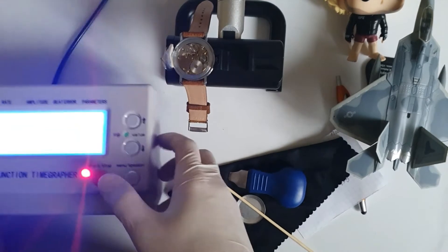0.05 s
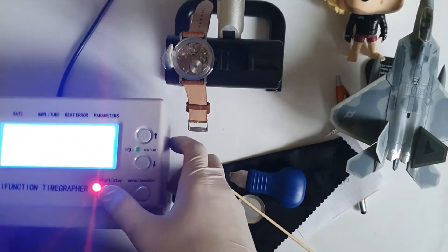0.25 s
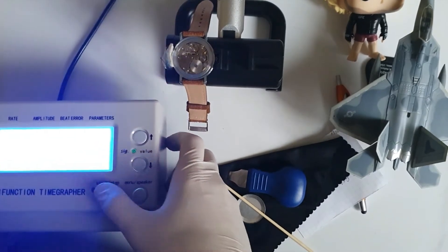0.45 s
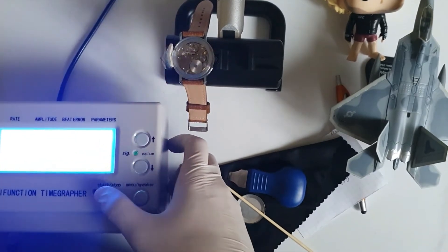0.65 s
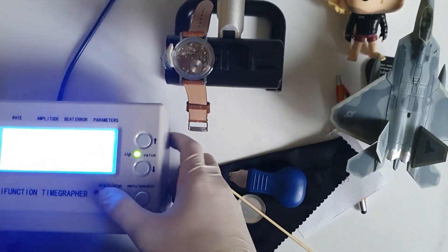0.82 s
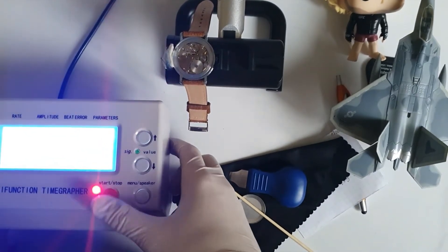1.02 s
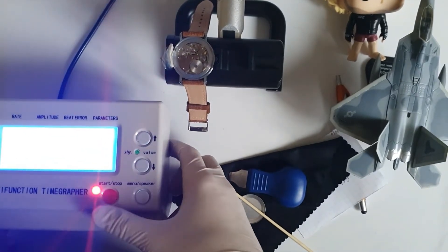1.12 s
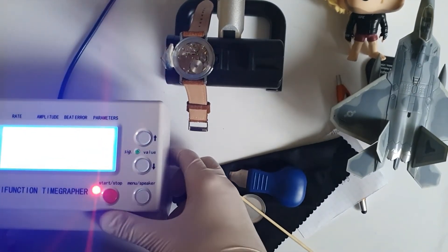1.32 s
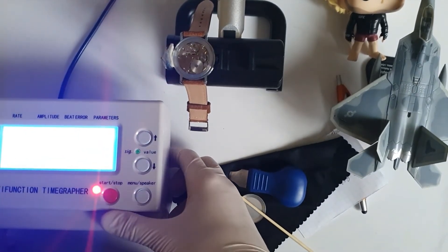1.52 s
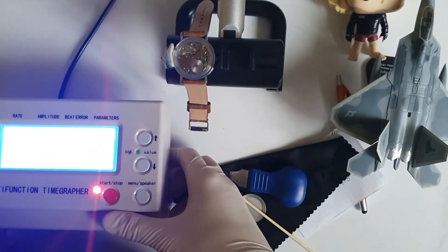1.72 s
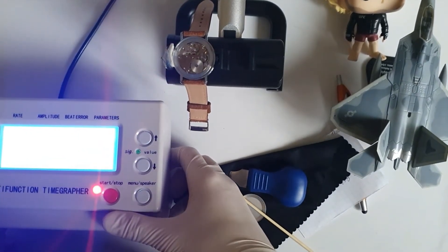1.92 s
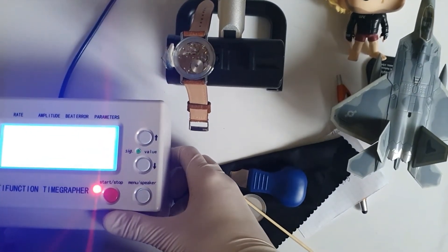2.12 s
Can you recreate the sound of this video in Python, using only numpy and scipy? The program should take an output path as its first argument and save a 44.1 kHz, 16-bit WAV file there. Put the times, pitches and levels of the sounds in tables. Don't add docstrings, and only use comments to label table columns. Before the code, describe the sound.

Plastic device case shoved and set down on a desk, followed by sharp push-button clicks, quiet room

```python
import sys
import numpy as np
from scipy import signal
from scipy.fft import rfft, irfft, next_fast_len
from scipy.io import wavfile
from scipy.ndimage import uniform_filter1d

SR = 44100
rng = np.random.default_rng(int(sys.argv[2]) if len(sys.argv) > 2 else 0)


def unload_wav(signal):
    wavfile.write(
        sys.argv[1],
        SR,
        np.round(np.clip(np.atleast_2d(signal).T, -1, 1) * 32767).astype(np.int16),
    )


def volts_from_decibels(level):
    exponent = np.asarray(level, float) / 20
    return 10 ** exponent


N = 94815

# pitch_hz, level_db (per hertz)
AIR_COLOUR = [(90, -2.5), (200, -13), (400, -28.5), (1000, -23), (3000, -30), (7000, -38), (14500, -36)]
# time_s, hum_db, rumble_db
HUM_LEVELS = [(0.0, -55.5, -41), (0.17, -68.5, -57.5), (0.23, -66, -47), (0.35, -58, -53), (0.58, -71, -58),
              (0.71, -62, -52.5), (0.79, -79, -70.5), (0.83, -64, -65), (1.08, -72.5, -63.5),
              (1.33, -71.5, -76.5), (1.41, -64, -72), (1.83, -69, -78), (1.93, -76, -69),
              (1.98, -61, -81.5), (2.07, -91.5, -84.5), (2.15, -76, -82.5)]
# time_s, scrape_db
DRAG_LEVELS = [(0, -55), (.05, -61), (.1, -60.5), (.18, -66.5), (.23, -63), (.27, -66), (.32, -91.5)]
# pitch_hz, level_db
SCRAPE_COLOUR = [(500, 2.5), (1200, -1.5), (2400, -6), (5000, -6), (9000, -6), (12000, -6), (14500, -18)]
# time_s, rumble_db, pitch_shift_share (0 low, 1 high)
SHOVE_LEVELS = [(0, -40, 0.81), (.05, -41, 0.5), (.1, -46.5, 0.77), (.18, -52.5, 0), (.38, -50.5, 0.77),
                (.44, -42, 0), (.5, -41.5, 0.08), (.57, -54, 0.1), (.66, -54, 0.02), (.79, -68.5, 0.1),
                (.88, -68.5, 0.97), (1.2, -84.5, 0.63)]
# time_s, level_db
RUB_LEVELS = [(.2, -100), (.25, -69.5), (.34, -71), (.43, -80), (.47, -100)]
# pitch_hz, level_db, t60_s (time to fade by 60 dB)
DESK_MODES = [(135, -9.5, 0.3), (236, -1, 0.098), (272.8, 3.5, .12), (301, -4, .1), (339.2, 0.5, .14),
              (392.6, -1, 0.045), (431, 1, .18), (470.3, -9.5, 0.19), (523.4, -9.5, .14), (566, -10, 0.45),
              (770, -10.5, 0.1039), (867, -14, .1), (1077, -14.5, 0.3), (1258, -13.5, .08)]
# start_s, level_db, pitch_hz,
# rise_cycles, extra_pitch_share (at the start)
CASE_THUMPS = [
    (.2161, -14.5, 295, .8, .7),
    (.9098, -34, 480, .8, .02),
    (.9072, -38, 230, .65, .02),
    (1.0140, -24, 500, .9, .05),
               (0.058, -39, 456, 0.98, 0.16), (0.2015, -35, 495, 0.47, 0.16),
                (0.216, -33.5, 135, 0.29, 0.38), (0.238, -29, 415, 0.34, 0.34),
                (.363, -42, 557, 0.75, 0.18), (0.4499, -31.5, 441, 0.43, 0.48),
                (.542, -39, 380, 0.39, 0.24), (0.5819, -31.5, 500, 0.51, 0.23),
                (.655, -49, 370, 0.82, 0.086), (.816, -51.5, 245, 0.46, 0.12),
                (0.892, -49.5, 233, 0.51, 0.36), (1.0154, -40.5, 232.4, 0.606, 0.29),
                (1.608, -63.5, 418, 0.56, 0.083)]
# start_s, level_db, centre_hz, width_hz, room_db
CONTACT_SNAPS = [(0.0604, -29, 2240, 1480, -12), (0.2186, -34, 1440, 900, -2.5), (.222, -40, 850, 900, -2),
                 (0.363, -37.5, 840, 600, -28), (0.4482, -39.5, 3800, 8450, 6),
                 (0.5795, -36.5, 1200, 1270, -4.5), (0.584, -48.5, 3830, 900, -23),
                 (0.9105, -25, 3890, 5126, -4.5), (0.9105, -36, 9700, 5000, -1.5),
                 (1.0127, -29, 3660, 2600, -18), (1.0150, -22, 1318, 1400, -13.5),
                 (1.137, -59, 2148, 1550, -22.5), (1.6107, -50, 2650, 1400, -18)]
# pitch_hz, level_db, t60_s
ROOM_BANDS = [(173.7, -1, .45), (337, -16, .4), (700, -6, 0.19), (1400, -4, 0.3), (2810, -10, 0.44),
              (5600, -10.5, 0.46), (11800, -9, .48)]
# pitch_hz, left_over_right_db
LEFT_LEAN = [(60, 3), (110, 8.5), (200, 6.5), (370, 2.5), (680, 3.5), (1240, 7), (2270, 2.5), (4160, 8),
             (7620, 5.5), (14000, 0.5)]


def level(x, db):
    return x * volts_from_decibels(db) / np.sqrt(np.mean(x ** 2))


def colour(x, points):
    n = next_fast_len(x.shape[-1] + 2048)
    p = np.array(points, float)
    hz = np.maximum(np.arange(n // 2 + 1) * SR / n, 1)
    gain = volts_from_decibels(np.interp(np.log(hz), np.log(p[:, 0]), p[:, 1], left=-60))
    return irfft(rfft(x, n) * gain, n)[..., :x.shape[-1]]


def band(x, hz, width_hz):
    return signal.lfilter(*signal.iirpeak(hz, hz / width_hz, SR), x)


def curve(table, column):
    p = np.array(table, float)
    return volts_from_decibels(np.interp(np.arange(N) / SR, p[:, 0], p[:, column]))


def walk(rate_hz):
    hold = int(SR / rate_hz)
    steps = np.repeat(rng.standard_normal(N // hold + 1), hold)
    return uniform_filter1d(steps, hold)[:N]


def stereo_noise(size):
    split_hz = 500
    noise = rng.standard_normal((3, size))
    shared_bass = signal.lfilter(*signal.butter(2, split_hz, fs=SR), noise[0])
    return shared_bass + signal.lfilter(*signal.butter(2, split_hz, "high", fs=SR), noise[1:])


def pan(db):
    return volts_from_decibels(np.array([[db], [-db]]) / 2)


def background():
    air = level(colour(stereo_noise(size=N), AIR_COLOUR), -78) * volts_from_decibels(0.573 * walk(12))
    hum_hz, waver_hz, flutter_db = 62, 3.2, 6
    turns = np.cumsum(hum_hz + waver_hz * walk(12)) / SR
    port_drift = 0.4 * np.array([walk(8.2), walk(18)])
    hum = np.sin(2 * np.pi * turns + port_drift) * volts_from_decibels(4 + flutter_db * walk(29))
    low = rng.standard_normal((3, N))
    rumble = level(band(band(low[0] + 1.35 * low[1:], 100, 57.8), 120, 90), 0)
    machine = hum * curve(HUM_LEVELS, 1) + rumble * curve(HUM_LEVELS, 2)
    return air + machine * pan(5.5)


def desk(force):
    ln_60_db = np.log(1000)
    return sum(volts_from_decibels(db) * band(force, hz, ln_60_db / np.pi / t60) for hz, db, t60 in DESK_MODES)


def drag():
    grains = rng.standard_normal((2, N)) * volts_from_decibels(1.8 * rng.exponential(size=N) + 1.5 * walk(60))
    scrape = level(colour(grains, SCRAPE_COLOUR), 0) * curve(DRAG_LEVELS, 1)
    rub_hz = 3800
    rub = level(band(band(grains[::-1], rub_hz, 4900), rub_hz, 6500), 0) * curve(RUB_LEVELS, 1)

    shoves = rng.standard_normal(N) * volts_from_decibels(1.65 * walk(45.79))
    time_s, shift = np.array(SHOVE_LEVELS)[:, ::2].T
    high = np.clip(np.interp(np.arange(N) / SR, time_s, shift), 0, 1)
    low_ring = level(desk(band(shoves, 310, 150)), 0)
    high_ring = level(desk(band(shoves, 570, 250)), 0)
    ring = (1 - high) * low_ring + high * high_ring
    return scrape + rub, ring * curve(SHOVE_LEVELS, 1)


def thumps():
    size = 2048
    out, t = np.zeros(N + size), np.arange(size) / SR
    for start_s, db, hz, rise, sag in CASE_THUMPS:
        u = t * hz / rise
        turns = rise * (u + sag * 2 * (1 - np.exp(-u / 2)))
        swell = (u / 3 * np.exp(1 - u / 3)) ** 3
        start = int(start_s * SR)
        out[start:start + size] += volts_from_decibels(db) * swell * np.sin(2 * np.pi * turns)
    return out[:N]


def snaps():
    size, fade_s = 2048, 0.004
    near, far, t = np.zeros((2, N + size)), np.zeros(N + size), np.arange(size) / SR
    noises = rng.standard_normal((len(CONTACT_SNAPS), 2, size))
    for (start_s, db, hz, width_hz, room_db), noise in zip(CONTACT_SNAPS, noises):
        gain = volts_from_decibels(db) * np.sqrt(SR / 2 / width_hz)
        wide_hz = min(2 * width_hz, SR / 3)

        def shell(x):
            return gain * band(band(band(x, hz, width_hz), hz, wide_hz), hz, wide_hz)

        tick = shell(2. * (t == 0))
        spit = shell(noise * np.exp(-t / fade_s))
        here = slice(int(start_s * SR), int(start_s * SR) + size)
        near[:, here] += 0.25 * tick + 0.11 * spit
        far[here] += volts_from_decibels(room_db) * tick
    return near[:, :N], far[:N]


def rattle(blows):
    fade_s, hz = 0.049, 420
    fade = np.exp(-1 / (fade_s * SR))
    shake = signal.lfilter([1 - fade], [1, -fade], np.abs(blows))
    low = rng.standard_normal((3, N))
    shiver = band(band(low[0] + 0.65 * low[1:], hz, 210), hz, 550)
    return level(shiver, 1) * shake


def room(x):
    delay_s = 0.0014
    t = np.arange(SR // 2 * 2) / SR
    tail = 0
    for hz, db, t60 in ROOM_BANDS:
        fade = np.exp(-np.log(1000) * t / t60) * np.clip(t / delay_s - 1, 0, 1)
        octave = band(band(stereo_noise(size=len(t)), hz, hz), hz, hz) / np.sqrt(hz / 10)
        tail = tail + volts_from_decibels(db) * fade * octave
    return signal.fftconvolve(x[None], tail, axes=1)[:, :N]


def scene():
    blows = thumps()
    clicks, sent = snaps()
    scrape, rumble = drag()
    body = blows + volts_from_decibels(-34.5) * 10 * desk(blows) + rumble
    tail = room(volts_from_decibels(7) * sent + volts_from_decibels(5) * scrape[0])
    tail = signal.sosfilt(signal.ellip(6, .5, 40, 11700, fs=SR, output="sos"), tail)
    body_tail = volts_from_decibels(-25.5) * room(blows + rumble)
    near = body + body_tail + rattle(blows) + clicks + scrape + tail

    lean = [(1, 0), *LEFT_LEAN]
    ports = np.array([colour(near[k], [(hz, db * (.5 - k)) for hz, db in lean]) for k in range(2)])
    dip_hz, sharpness = 7715, 3.9
    return ports - 0.75 * band(ports, dip_hz, dip_hz / sharpness) + background()


def top_cut(x):
    return signal.sosfilt(signal.butter(12, 14560, fs=SR, output="sos"), x)


def record(dry):
    cut = signal.sosfilt(signal.ellip(8, .2, 70, 14600, fs=SR, output="sos"), dry)
    return top_cut(cut)


dry = scene()
out = record(dry)
unload_wav(out)
```